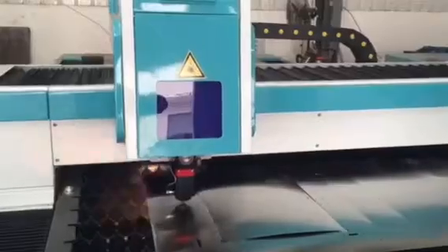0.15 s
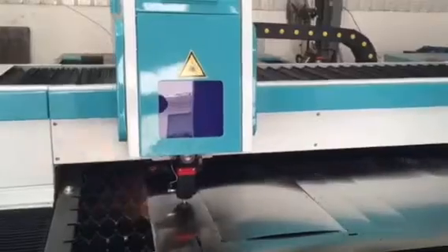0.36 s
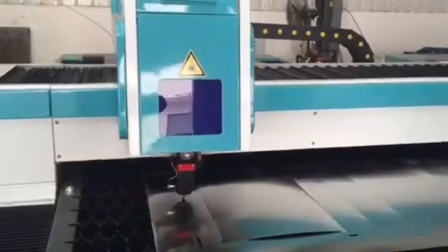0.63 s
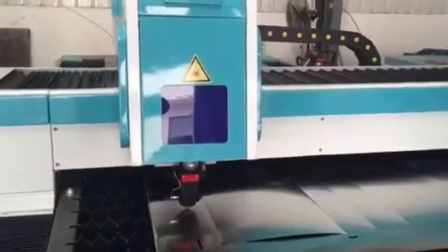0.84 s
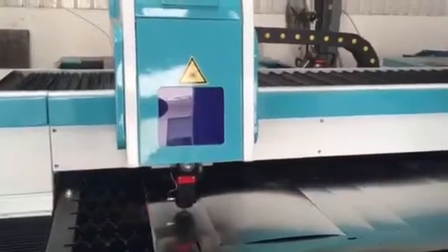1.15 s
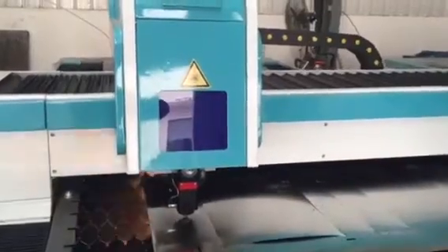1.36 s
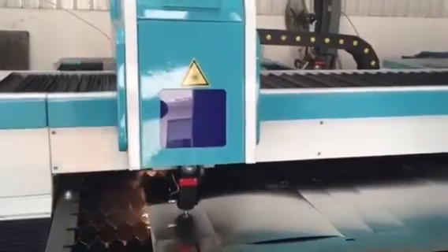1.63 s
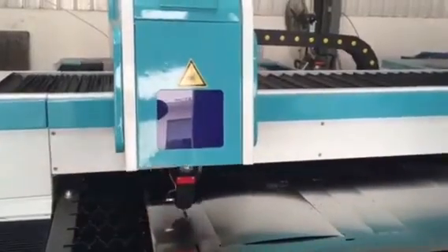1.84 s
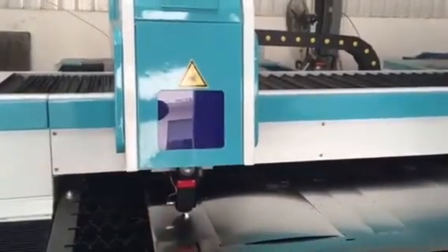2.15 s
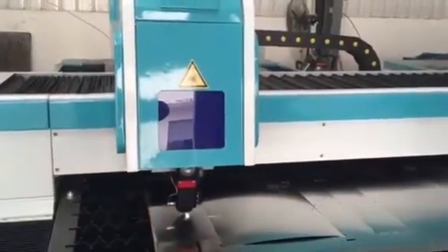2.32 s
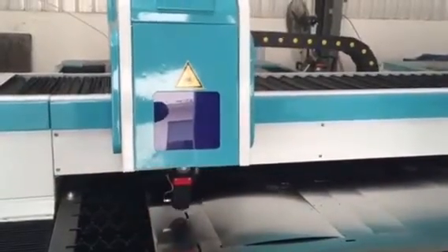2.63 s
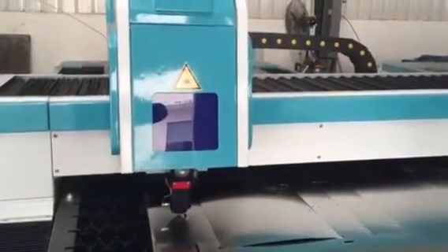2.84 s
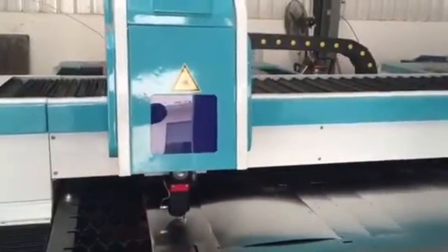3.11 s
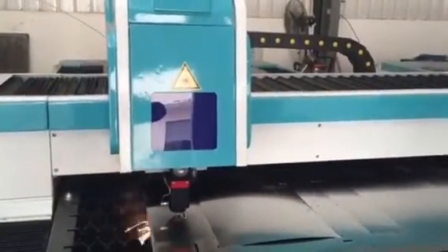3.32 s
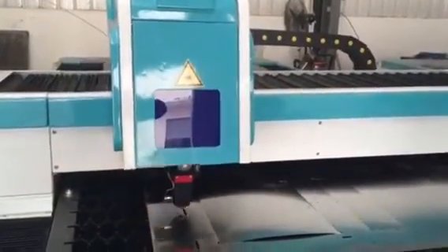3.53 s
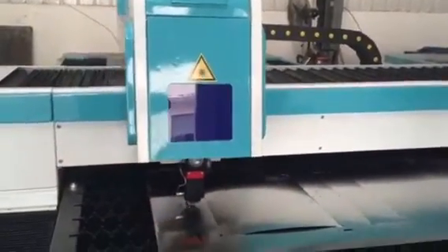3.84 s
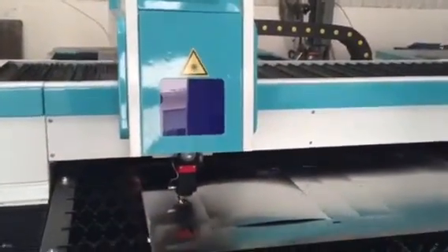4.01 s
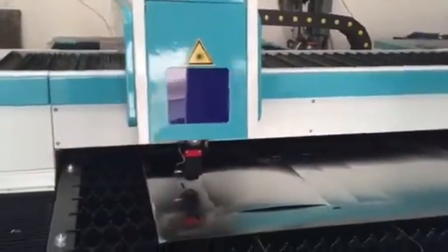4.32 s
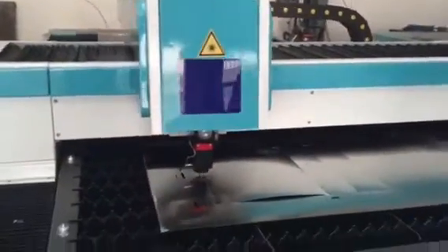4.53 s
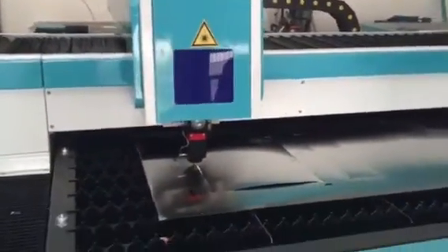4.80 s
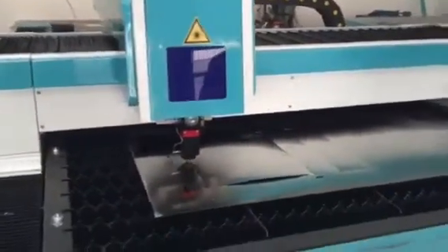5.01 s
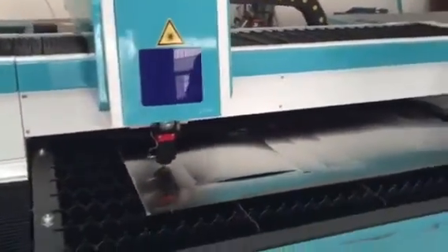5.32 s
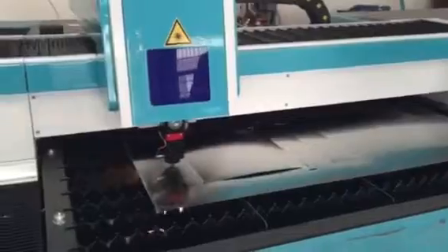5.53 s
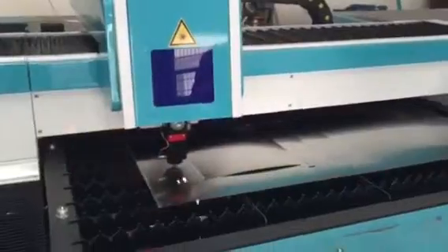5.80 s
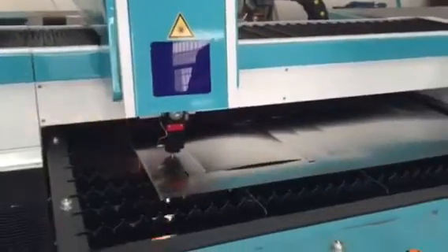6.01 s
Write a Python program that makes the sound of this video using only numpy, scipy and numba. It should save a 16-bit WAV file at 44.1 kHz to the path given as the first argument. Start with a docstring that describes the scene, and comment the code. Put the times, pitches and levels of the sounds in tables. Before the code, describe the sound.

A laser cutter works on thin sheet metal close by, in a workshop with little echo. A bright gas hiss runs throughout, swelling and dipping over a soft, steady extraction fan drone. The first two seconds hold light, uneven cutting strokes with a faint whistling edge. Short, sharp pops mark piercings at about 0.6, 1.8, 2.5, 3.5 and 5.1 seconds, each followed by a surge of hiss and usually a brief dip. From about 2.1 to 4.3 seconds the cut is loudest, a rough, hissing roar with fine spitting of sparks. Molten metal snaps sharply at 3.5 and 4.3 seconds. Brief low puffs of gas rumble near 2, 2.7, 3.6, 4.4 and 5.2 seconds. Around 4.4 seconds a rush of gas falls in pitch, then lighter strokes continue, easing off toward the end at about six seconds.

```python
"""Laser cutting of sheet metal

Turbulent gas hisses at the nozzle and roars through the kerf, the slit left by the beam, exciting
the resonances of the cutting bed. Each piercing gives a falling pop, a flare of resonant noise and a
surge of hiss, after which the gas flow dips. Ejected melt spits and snaps, deflected gas rumbles
in gusts, and an extraction fan drones in the background."""
import sys
import numpy as np
from scipy import signal
from scipy.fft import rfft, irfft
from scipy.io import wavfile
from numba import njit

SR = 44100
rng = np.random.default_rng(int(sys.argv[2]) if len(sys.argv) > 2 else 0)


def generate_wav(signal):
    """Clip the signal to [-1, 1] and save it as 16-bit WAV at the path in sys.argv[1]."""
    frames = np.transpose(np.atleast_2d(signal))
    scaled = np.clip(frames, -1, 1) * 32767
    pcm = np.round(scaled).astype(np.int16)
    wavfile.write(sys.argv[1], SR, pcm)


N = 271656
T = np.arange(N) / SR
BIN_HZ = np.fft.rfftfreq(N, 1 / SR) + 1e-3  # the offset keeps the logarithm finite

# Spectral envelopes of the four flow noises: frequency_hz, gain_db
FAN_SPECTRUM = [(20, -55), (35, -30), (50, -22.5), (70, -19.5), (100, -17), (190, -15.5), (250, -21),
                (280, -22), (380, -22), (470, -28.5), (620, -19.5), (780, -26.5), (1200, -24.5),
                (10000, -35.5)]
GUST_SPECTRUM = [(20, -14), (32, -2), (50, 9), (120, 14), (250, 11.5), (400, 7), (700, 0.5), (1500, -18),
                 (5000, -37)]
NOZZLE_SPECTRUM = [(200, -19), (450, -7.5), (650, 4), (1100, 7), (2000, 6), (3500, 8.5), (5000, 9),
                   (6400, 9), (7100, 6.5), (7700, 5.5), (8600, 11), (10000, 5.5), (11000, 13.5)]
KERF_SPECTRUM = [(200, -48), (600, -26), (1000, -0.5), (1500, 6), (2200, 9), (3300, 9.5), (4400, 6),
                 (5400, 4), (6300, 1.5), (7400, -6), (8700, -5), (11000, -5)]
# Resonances and antiresonances of the bed and gantry: centre_hz, bandwidth_hz, gain_db
BED_RESONANCES = [(495, 100, -1.5), (618, 56, 5.5), (788, 38, -7), (863, 48, 4.5), (1160, 40, 0),
                  (1340, 105, -4), (1466, 43, 4.5), (1560, 86, -3), (1790, 120, 0), (1880, 58, -3),
                  (1950, 61, 1), (2316, 63, 5), (2442, 107, -7), (2592, 56, 3), (2790, 50, 1.5),
                  (2890, 65, -5), (2962, 70, 5), (3290, 55, -1), (3380, 60, 3), (3980, 79, -3.5),
                  (4058, 38, 4.5), (4300, 78, 1.5), (5000, 160, -1.5), (6145, 56, 1.5), (6200, 52, 3.5),
                  (6770, 45, 3), (7080, 50, 2), (8652, 50, 1.5)]
# Puffs of escaping gas: start_s, length_s, level_db
GAS_GUSTS = [(1.948, 0.083, -27), (2.65, 0.059, -21), (2.7, 0.063, -21.5), (3.61, 0.066, -19),
             (3.689, 0.046, -22), (4.383, 0.15, -25), (4.516, 0.019, -20), (5.222, 0.13, -26)]
# Bursts of molten metal: start_s, level_db
MELT_SNAPS = [(3.4789, -1), (4.2688, -1)]
# Further flares of resonant noise rung by the gas: most at openings in the sheet, the quiet ones near 3 kHz at
# the nozzle during light cuts: start_s, length_s, start_hz, end_hz, bandwidth_hz, level_db
GAS_FLARES = [(0.024, 0.21, 3540, 2720, 700, -35.5), (1.003, 0.14, 3400, 3220, 700, -32.5),
              (1.267, 0.094, 3320, 2950, 700, -33.5), (1.807, 0.043, 3160, 2970, 300, -22),
              (1.813, 0.13, 1180, 1100, 260, -27), (1.904, 0.077, 3420, 4100, 1800, -20.5),
              (2.18, 0.11, 6100, 6500, 2400, -24), (3.211, .07, 3160, 3140, 1400, -23),
              (3.577, 0.062, 4140, 4500, 1400, -22), (3.634, 0.034, 5500, 7000, 3000, -18.5),
              (4.392, 0.038, 8450, 7700, 3000, -22), (4.405, 0.083, 2700, 1560, 1890, -18),
              (4.432, .084, 1540, 814, 1200, -26), (4.657, 0.36, 1310, 960, 1590, -31),
              (4.952, 0.046, 5000, 5500, 5000, -25.5), (5.18, 0.21, 1210, 1800, 1600, -29.5),
              (5.498, 0.38, 850, 1000, 900, -41.5)]
# Small holes pierced by the beam:
# start_s, pop_db, pop_pitch_hz, flare_length_s, flare_db, surge_db, pause_delay_s, pause_depth_db
PIERCINGS = [(0.6186, -14.5, 514, .088, -27, -27.5, .367, 9.5),
             (1.8054, -12.5, 1060, 0.12, -25, -24.5, 0.314, 1.5),
             (2.529, -11.5, 560, 0.12, -23.5, -28.5, 0.33, 11),
             (3.476, -11, 596, 0.11, -36, -24, 0.363, 12.5), (4.26, -22, 1500, .02, -36, -27.5, 0.42, 4.5),
             (5.0763, -12.5, 547, 0.17, -28, -28, 0.37, 13)]
# Narrow resonances of the nozzle over the sheet: pitch_hz, bandwidth_hz, level_db
NOZZLE_RESONANCES = [(2330, 39, -35.5), (2980, 34, -31), (3330, 25, -32)]
# Strokes of the cut: start_s, end_s, rise_s, fall_s, roar_db, hiss_db
CUT_STROKES = [(-.05, 0.173, .1, 0.045, -28.5, -37), (0.5, .75, 0.11, .05, -28, -34),
               (0.756, 1.098, .08, .05, -25, -50), (1.09, 1.367, .05, 0.13, -30, -39),
               (1.75, 2.12, 0.15, .05, -25, -45), (1.805, 2.094, 0.022, .02, -21, -36),
               (2.13, 2.53, 0.094, 0.027, -17, -24.5), (2.528, 2.85, .03, 0.047, -17.5, -27.5),
               (2.854, 3.467, .04, 0.0078, -17.3, -29.5), (3.473, 3.858, 0.0071, 0.043, -16.5, -29.5),
               (3.87, 4.273, 0.11, 0.012, -16, -31.5), (4.292, 4.544, 0.024, 0.12, -24, -42),
               (4.667, 5.06, 0.03, 0.085, -28.5, -27), (5.13, 5.35, 0.24, .04, -24, -48),
               (5.36, 5.65, .08, .08, -27.5, -50), (5.85, 5.926, .02, .05, -35, -50),
               (6.065, 6.2, .06, .05, -28, -33.5)]


def undb(db):
    """Amplitude ratio of a level in decibels."""
    return 10 ** (np.asarray(db) / 20)


def white():
    """Gaussian white noise of unit variance."""
    return rng.standard_normal(N)


def colour(x, envelope):
    """Spectral shaping by gains interpolated on a log-frequency axis."""
    hz, db = np.transpose(envelope)
    return irfft(rfft(x) * undb(np.interp(np.log(BIN_HZ), np.log(hz), db)), N)


def flutter(spread_db, rate_hz):
    """Random amplitude modulation: a gain whose level follows low-passed noise."""
    drift = irfft(rfft(white()) / (1 + (2 * BIN_HZ / rate_hz) ** 2), N)
    return undb(spread_db * drift / drift.std())


def swell(start_s, length_s, skew):
    """Half-sine envelope of mean power near 1; a skew below 1 brings the crest forward."""
    progress = np.clip((T - start_s) / length_s, 0, 1)
    return np.sqrt(2) * np.sin(np.pi * progress ** skew)


def trapezoid(start_s, end_s, rise_s, fall_s):
    """Trapezoidal envelope with its ramps centred on the start and the end."""
    return np.clip(0.5 + (T - start_s) / rise_s, 0, 1) * np.clip(0.5 + (end_s - T) / fall_s, 0, 1)


@njit
def resonate(x, centre_hz, width_hz):
    """Second-order resonator with unit gain at its moving centre frequency."""
    out, band_state, low_state = np.empty(len(x)), 0.0, 0.0
    for i in range(len(x)):
        tuning = np.tan(np.pi * centre_hz[i] / SR)
        damping = width_hz / centre_hz[i]
        band = (band_state + tuning * (x[i] - low_state)) / (1 + tuning * (tuning + damping))
        band_state = 2 * band - band_state
        low_state += 2 * tuning * band
        out[i] = damping * band
    return out


def narrowband(pitch_hz, width_hz):
    """A resonator driven by noise gives a wavering tone, here of unit power."""
    tone = resonate(white(), np.full(N, float(pitch_hz)), float(width_hz))
    return tone / tone.std()


def crack(impulses, centre_hz=3600.0, width_hz=4200.0):
    """A heavily damped resonator answers each impulse with one sharp cycle."""
    return resonate(impulses, np.full(N, centre_hz), width_hz) * SR / (np.pi * width_hz)


def turbulence(stream_db, stream_rate_hz, eddy_db, eddy_rate_hz):
    """Turbulent mixing noise: eddies of each size modulate their own band, and the whole jet flutters."""
    edges_hz = [0, 700, 1400, 2600, 4200, 7000, SR]
    spectrum = rfft(white())
    stream = np.zeros(N)
    for low_hz, high_hz in zip(edges_hz, edges_hz[1:]):
        band = irfft(spectrum * ((BIN_HZ >= low_hz) & (BIN_HZ < high_hz)), N)
        stream += band * flutter(eddy_db, eddy_rate_hz)
    return stream * flutter(stream_db, stream_rate_hz)


def fan(duct_db=-44):
    """Broadband flow noise of the extraction fan, with one duct resonance."""
    duct_tone = undb(duct_db) * narrowband(pitch_hz=242, width_hz=10)
    rumble = colour(white(), FAN_SPECTRUM) * flutter(spread_db=1, rate_hz=16)
    return rumble + duct_tone


def workshop(x, t60_s=0.14, gap_s=0.0073, wet_db=-20):
    """Reverberation: dense reflections from the panels and floor decay exponentially."""
    tail = white() * (T > gap_s) * np.exp(-np.log(1000) * T / t60_s)
    tail = tail[:SR // 2] / np.sqrt(np.sum(tail ** 2))
    return x + undb(wet_db) * signal.fftconvolve(x, tail)[:N]


def bed(x):
    """Resonance and antiresonance of slats, sheet and gantry put peaks and dips in the spectrum."""
    spectrum = rfft(x)
    for centre_hz, width_hz, gain_db in BED_RESONANCES:
        detuning = 1j * (BIN_HZ / centre_hz - centre_hz / BIN_HZ) * centre_hz / width_hz
        spectrum *= (detuning + undb(gain_db / 2)) / (detuning + undb(-gain_db / 2))
    return irfft(spectrum, N)


def gusts():
    """Low-frequency turbulence: deflected gas tumbles out from under the sheet in puffs."""
    strength = sum(undb(db) * swell(start_s, length_s, skew=0.81) for start_s, length_s, db in GAS_GUSTS)
    return colour(white(), GUST_SPECTRUM) * strength


def snaps():
    """Impulsive excitation: each burst of melt is over within a millisecond."""
    impulses = np.zeros(N)
    for start_s, level_db in MELT_SNAPS:
        impulses[int(start_s * SR)] = undb(level_db)
    return crack(impulses)


def pops(onset_hz=4480, fall_s=0.0037, overshoot=1.4, skew=0.67, cutoff_hz=380):
    """Exponential chirp: as the beam opens a hole, the tone falls through its listed pitch in fall_s."""
    out = np.zeros(N)
    for start_s, level_db, pitch_hz, *_ in PIERCINGS:
        glide = np.clip((T - start_s) / fall_s, 0, overshoot)
        chirp_hz = onset_hz * (pitch_hz / onset_hz) ** glide
        phase = 2 * np.pi * np.cumsum(chirp_hz * (glide > 0)) / SR
        envelope = np.sqrt(np.abs(np.sin(np.pi * (glide / overshoot) ** skew)))
        out += undb(level_db) * envelope * np.sin(phase)
    # so small a hole radiates no bass
    return signal.sosfilt(signal.butter(4, cutoff_hz, "highpass", fs=SR, output="sos"), out)


def flares(fresh_hz=1760, widened_hz=1000, hole_width_hz=1960):
    """Flow-excited resonance: gas rings an opening, or the nozzle in light cuts, and the pitch glides as the
    ringing space changes."""
    hole_flares = [(start_s, length_s, fresh_hz, widened_hz, hole_width_hz, level_db)
                   for start_s, _, _, length_s, level_db, *_ in PIERCINGS]
    out = np.zeros(N)
    for start_s, length_s, start_hz, end_hz, width_hz, level_db in hole_flares + GAS_FLARES:
        centre_hz = np.exp(np.interp(T, [start_s, start_s + length_s], np.log([start_hz, end_hz])))
        ring = resonate(white(), centre_hz, float(width_hz))
        ring = resonate(ring, centre_hz, float(width_hz))  # a second pass steepens the skirts
        out += ring / ring.std() * undb(level_db) * swell(start_s, length_s, skew=0.64)
    return out


def gas_flow(bleed_s=0.034, reopen_s=0.018):
    """Throttling: after each piercing the jet's gain dies away briefly and recovers faster."""
    dip_db = np.zeros(N)
    for start_s, *_, delay_s, depth_db in PIERCINGS:
        since_s = T - start_s - delay_s
        time_constant_s = np.where(since_s < 0, bleed_s, reopen_s)
        dip_db += depth_db * np.exp(-np.abs(since_s / time_constant_s) ** 1.1)
    return undb(-dip_db)


def surge_power(delay_s=0.089, length_s=0.22, rise_s=0.022, fall_s=0.078, step_db=-2):
    """Power envelope of the extra hiss: a step at each piercing, then a swell as the head rounds it."""
    power = np.zeros(N)
    for start_s, *_, surge_db, _, _ in PIERCINGS:
        middle_s = start_s + delay_s + length_s / 2
        step = undb(step_db) * trapezoid(start_s + rise_s / 2, middle_s, rise_s, fall_s)
        hump = swell(start_s + delay_s, length_s, skew=0.84)
        power += undb(surge_db) ** 2 * (step ** 2 + hump ** 2)
    return power


def jet_strengths(idle_db=-31, surge_roar_db=-2.5):
    """Incoherent addition: idle jet, surges and strokes sum in power to set the gains of hiss and roar."""
    surge = surge_power()
    hiss_power = undb(idle_db) ** 2 + surge
    roar_power = undb(surge_roar_db) ** 2 * surge
    for start_s, end_s, rise_s, fall_s, roar_db, hiss_db in CUT_STROKES:
        cutting = trapezoid(start_s, end_s, rise_s, fall_s)
        hiss_power += cutting * undb(hiss_db) ** 2
        roar_power += cutting * undb(roar_db) ** 2
    return np.sqrt(hiss_power), np.sqrt(roar_power)


def whistles(strength, growth=0.77):
    """Narrow nozzle resonances grow more slowly than the roar, so they stand out most in light cuts."""
    tones = sum(undb(db) * narrowband(pitch_hz, width_hz) for pitch_hz, width_hz, db in NOZZLE_RESONANCES)
    return tones * strength ** growth


def nozzle(strength):
    """Free-jet turbulence radiates a bright, even hiss."""
    jet = turbulence(stream_db=0.74, stream_rate_hz=66, eddy_db=1.3, eddy_rate_hz=26)
    return colour(jet, NOZZLE_SPECTRUM) * strength


def kerf(strength, sparks_per_s=45, spark_db=10):
    """Confined turbulence roars in the cut; droplets of melt spit out as a Poisson process."""
    jet = turbulence(stream_db=0.9, stream_rate_hz=50, eddy_db=0.9, eddy_rate_hz=45)
    ejections = rng.random(N) < sparks_per_s / SR
    sparks = crack(ejections * rng.uniform(-1, 1, N) * undb(spark_db))
    return (colour(jet, KERF_SPECTRUM) + sparks) * strength * flutter(spread_db=0.48, rate_hz=18)


def scene(nozzle_db=-2.0, kerf_db=-1.21):
    """Superposition: the cut, filtered by bed and room, joins gusts and fan in two identical channels."""
    hiss_gain, roar_gain = jet_strengths()
    hiss = undb(nozzle_db) * nozzle(hiss_gain)
    roar = undb(kerf_db) * kerf(roar_gain)
    jet = gas_flow() * (hiss + roar + whistles(roar_gain))
    cut = jet + flares() + pops() + snaps()
    mono = workshop(bed(cut)) + gusts() + fan()
    return np.array([mono, mono])


def record(dry, ceiling=0.82, cutoff_hz=10380):
    """Soft saturation rounds the highest peaks; a steep low-pass filter limits the bandwidth."""
    rounded = dry / (1 + (dry / ceiling) ** 6) ** (1 / 6)
    return signal.sosfilt(signal.ellip(10, 0.2, 80, cutoff_hz, fs=SR, output="sos"), rounded)


dry = scene()
out = record(dry)
generate_wav(out)
```